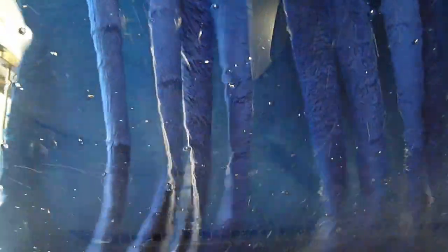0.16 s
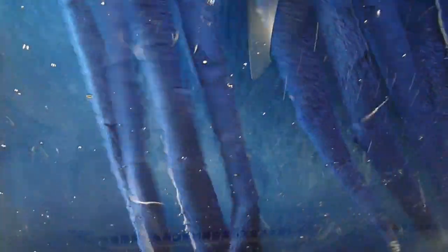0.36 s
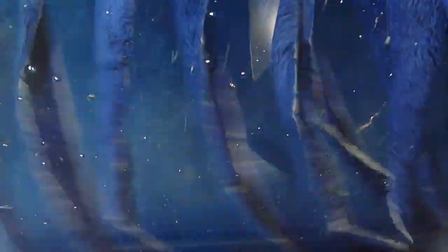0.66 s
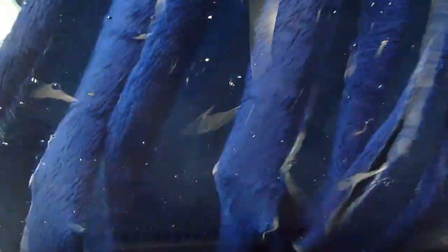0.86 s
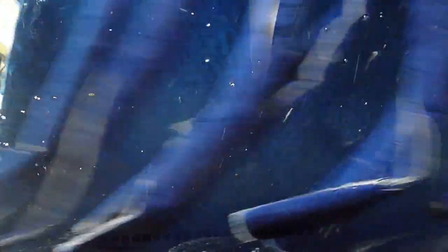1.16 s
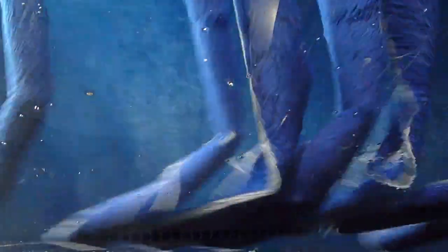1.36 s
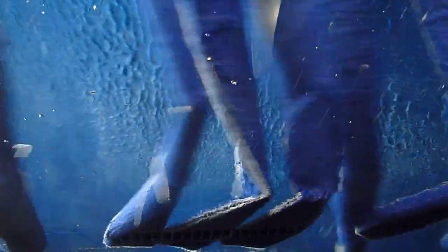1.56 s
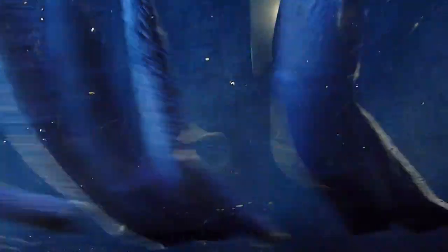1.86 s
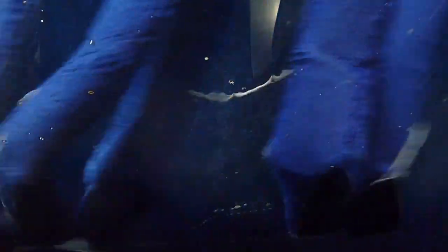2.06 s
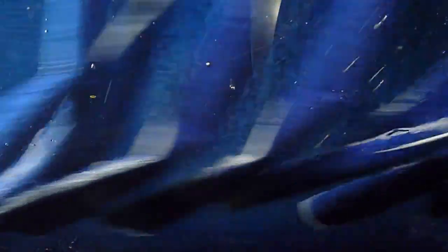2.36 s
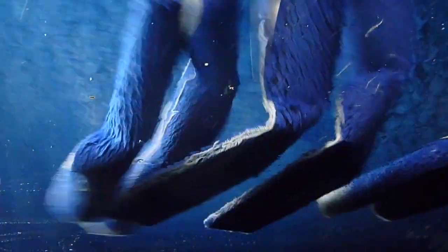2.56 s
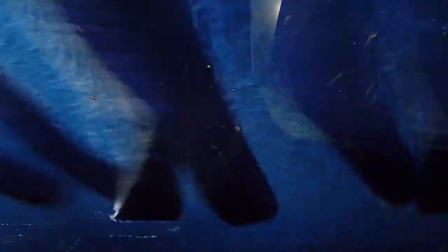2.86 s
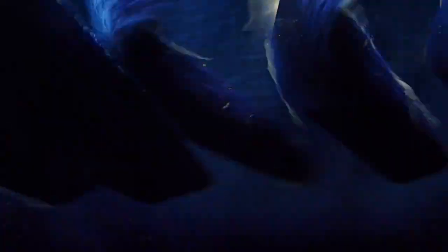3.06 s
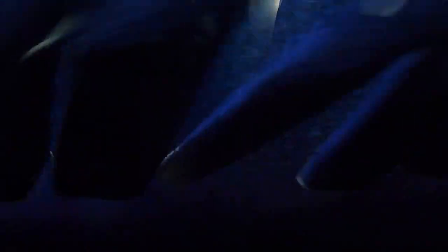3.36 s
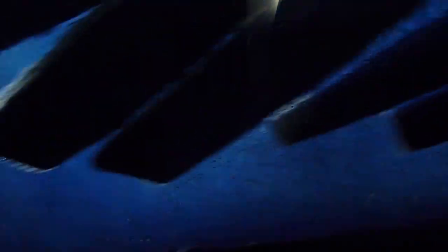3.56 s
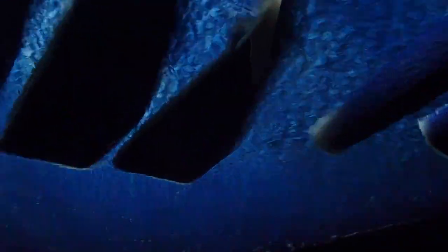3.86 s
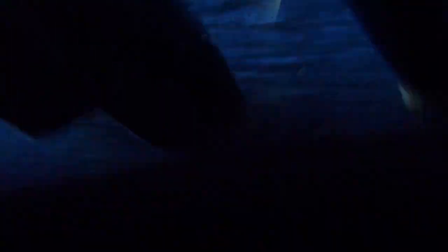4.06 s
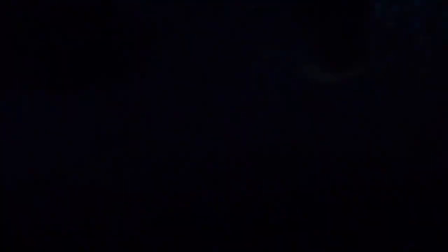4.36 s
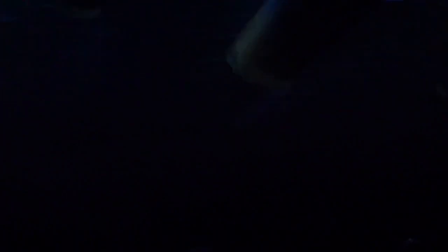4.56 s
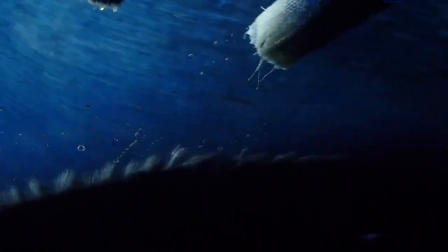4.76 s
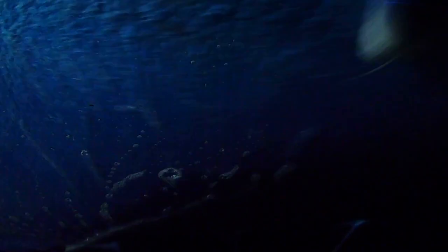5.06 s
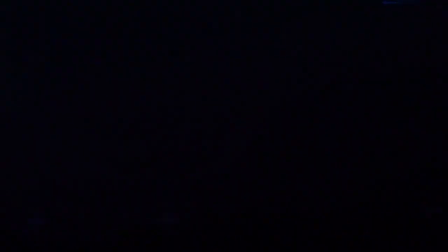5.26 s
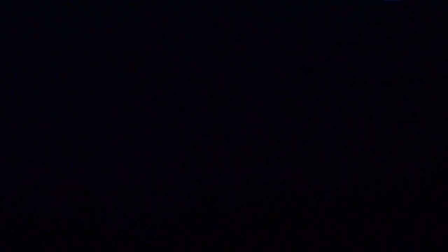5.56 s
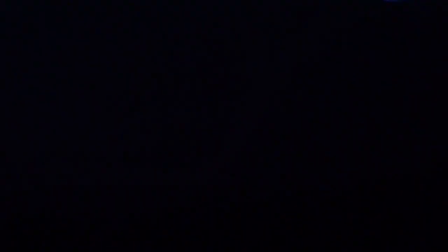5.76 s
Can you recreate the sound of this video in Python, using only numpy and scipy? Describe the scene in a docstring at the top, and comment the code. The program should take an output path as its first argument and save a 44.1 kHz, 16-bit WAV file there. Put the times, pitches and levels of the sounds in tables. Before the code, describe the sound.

Heavy wet cloth flaps, drags and smacks across car glass and panels, with deep cabin booms and spraying water fading to thinner mist.

```python
"""Hanging strips of wet cloth in an automatic car wash, heard from inside a closed car: they slap and wipe
across the glass with gritty impact noise, and pound the roof, whose blows ring the cabin's air modes.
Cloth dragging by stick and slip rocks the body, drones on the bonnet and growls on the panels.
Jets are dense random impacts, drumming on panels and spraying the windscreen; the mist thins as the car
rolls on. A faint machine whine of wavering sines and the filtered hiss of the wash hall lie behind."""
import sys
import numpy as np
from scipy import signal
from scipy.fft import rfft, irfft, next_fast_len
from scipy.io import wavfile
from scipy.ndimage import uniform_filter1d, minimum_filter1d

SR = 44100
rng = np.random.default_rng(int(sys.argv[2]) if len(sys.argv) > 2 else 0)


def persist_wave(psi):
    """Save psi, clipped to +-1, as 16-bit WAV."""
    counts = np.round(np.clip(psi, -1, 1) * 32767).astype(np.int16)
    wavfile.write(sys.argv[1], SR, np.atleast_2d(counts).T)


N = 261513
TIME = np.arange(N) / SR  # [s]
USUAL_SMACK_DB = -30  # smack level of an ordinary slap, before the overall smack level

# cloth strips hitting the windscreen: (time [s], smack level [dB], wetness = splash over smack [dB],
# landing time [s], ring of the struck spot [Hz])
SLAPS = [(0.097, -32.5, -15.5, .008, 1950), (0.216, -39, -2, 0.0074, 2080), (0.25, -38, -6.5, .012, 1900),
         (0.425, -36.5, -16.5, .015, 1150), (0.72, -36.5, -18.5, .012, 1190),
         (0.86, -40.5, -19, .012, 1100), (1.03, -41.5, -12, .006, 1255), (1.139, -37, -11.5, 0.0049, 1464),
         (1.194, -31.5, -14, 0.0079, 1885), (1.318, -37, -9, 0.0046, 1920),
         (1.463, -33.5, -17, 0.0029, 1380), (1.502, -35.5, -2.5, .007, 2790),
         (1.566, -33.5, -5.5, 0.0023, 1896), (1.832, -32, -11.5, 0.0097, 1100),
         (1.968, -29, -14.5, .005, 974), (2.002, -44, 3, 0.0075, 1985), (2.092, -27.5, -10, 0.008, 1715),
         (2.177, -41.5, -1, .002, 2880), (2.283, -28, -9, 0.0032, 1944), (2.305, -33, -14.5, 0.0036, 1600),
         (2.322, -38.5, 1, 0.0027, 3320), (2.382, -43, 0.5, .0026, 3800), (2.425, -36, -8, 0.014, 1204),
         (2.458, -37.5, -2, 0.0049, 1910), (2.489, -47.5, 1.5, 0.0041, 4170),
         (2.742, -31.5, -3, 0.0043, 2885), (2.769, -31, -15.5, .003, 1760),
         (2.891, -29.5, -5.5, 0.0095, 1610), (2.913, -32.5, -10, .008, 1175),
         (2.939, -30.5, -7, 0.0048, 1606), (3.059, -31, -6.5, .0025, 2030),
         (3.078, -33.5, -3.5, 0.0017, 2115), (3.084, -28, -9.5, 0.0035, 2100),
         (3.108, -45, -9.5, 0.0053, 1880), (3.201, -32.5, -7, .005, 1624), (3.214, -25, -8.5, 0.005, 1675),
         (3.353, -24, -18.5, 0.0033, 1620), (3.373, -36, -7.5, 0.011, 1475),
         (3.416, -26.5, -7.5, 0.0062, 1950), (3.555, -35, -4.5, .016, 1764),
         (3.588, -33.5, -12, 0.0069, 1640), (3.69, -29, -6.5, 0.0048, 2530),
         (3.719, -32.5, -8, .0094, 1348), (3.756, -40.5, -12, .0074, 1006),
         (3.864, -30, -5.5, 0.0051, 2610), (3.887, -25, -3, 0.0065, 2090), (4.033, -36, -2.5, .014, 1916),
         (4.187, -30, -25.5, .002, 1097), (4.207, -39, 0.5, .002, 2710), (4.226, -28, 1.5, .002, 5030),
         (4.246, -34.5, -2, .002, 2770), (4.255, -39, -5, 0.0017, 2310), (4.264, -39, -4.5, .002, 2715),
         (4.279, -29, 5.5, 0.0021, 2670), (4.368, -50.5, 4.5, .005, 2980), (4.384, -35, 0.5, 0.0028, 1910),
         (4.45, -29, -5, 0.002, 2170), (4.47, -40, -2.5, 0.0027, 1880), (4.539, -38.5, -2, 0.0028, 1880),
         (4.623, -35.5, -1, 0.0028, 2140), (4.69, -39, 2.5, 0.0046, 2290), (4.744, -44.5, 2, 0.0055, 2030),
         (4.881, -35, -4, 0.0024, 1680), (4.922, -41, 0, 0.0072, 4130), (5.074, -42, -1, 0.0027, 2296),
         (5.13, -40, -17.5, .012, 1106), (5.2, -38.5, -6.5, 0.0048, 1097), (5.224, -35, -12.5, .018, 1320),
         (5.351, -45, 0.5, 0.0026, 4120), (5.36, -39, -14, 0.0035, 2090), (5.509, -44.5, 1, 0.005, 2530),
         (5.592, -43.5, -2, 0.0077, 1690), (5.628, -40.5, -22, .005, 998), (5.746, -37, -4, 0.0037, 1815),
         (5.778, -41, -4.5, .005, 2310), (5.889, -38.5, -10.5, .005, 1500)]
# heavy strips landing on the roof: (time [s], relative strength [dB])
ROOF_BLOWS = [(0.05, 1.5), (0.463, -1), (0.555, -3.5), (0.724, -8), (0.83, -7), (1, -6), (1.112, -5),
              (1.325, -13), (1.455, -14), (1.782, -13), (1.992, -6.5), (2.294, 2), (2.441, -8.5),
              (3.152, -8), (3.541, -11), (3.717, -8.5), (3.878, -6), (4.191, -3), (4.378, -11.5),
              (4.463, -3.5), (4.849, -6.5), (4.98, -11.5), (5.14, -5), (5.279, -1.5), (5.414, -3),
              (5.836, -8)]
# spectrum of panels under drumming water or thudding cloth: (frequency [Hz], density [dB per Hz])
DRUM_SPECTRUM = [(150, -31), (260, -8.5), (340, 0), (420, -2.5), (530, -5.5), (610, -9), (760, -10),
                 (900, -19.5), (1300, -26.5), (2500, -48.5)]
# spectrum of water splashing on the glass: (frequency [Hz], density [dB per Hz])
SPLASH_SPECTRUM = [(1500, -31.5), (2400, 5), (2800, 4.5), (3400, 1), (4400, -2), (5300, -7), (6500, -14.5),
                   (8000, -30.5), (10000, -21.5)]


def from_db(db):
    """Amplitude is ten to the level over 20."""
    return 10 ** (np.asarray(db) / 20)


def rms_one(x):
    """Dividing by the root mean square gives unit power."""
    return x / np.sqrt(np.mean(x ** 2) + 1e-20)


def in_time(rows):
    """Linear interpolation of (time, level) rows gives a level at every sample."""
    return np.interp(TIME, *np.transpose(rows))


def drift(rate_hz):
    """Slow chance with spread 1: white noise through two equal one-pole low-passes."""
    step = 40  # samples between the points of the slow noise
    pole = np.exp(-2 * np.pi * rate_hz * step / SR)
    noise = rng.standard_normal(N // step + 2002)
    slow = signal.lfilter([1], [1, -2 * pole, pole * pole], noise)[2000:]  # without the filter's start
    return np.interp(np.arange(N) / step, np.arange(len(slow)), rms_one(slow))


def white_noise():
    """Independent normal samples carry equal power at all frequencies."""
    return rng.standard_normal(N)


def drops(per_s, spread_db):
    """Shot noise: impacts at random moments, many small and a few large."""
    sizes = from_db(spread_db * np.minimum(rng.exponential(1, N), 4))
    signs = rng.choice([-1, 1], N)
    return (rng.random(N) < per_s / SR) * sizes * signs


def coloured(x, spectrum):
    """Linear filtering multiplies the spectrum of x by a gain curve; rms 1."""
    size = next_fast_len(N)
    hz, level_db = np.transpose(spectrum)
    bins_hz = np.maximum(np.fft.rfftfreq(size, 1 / SR), 1)
    gain = from_db(np.interp(np.log(bins_hz), np.log(hz), level_db, left=-90, right=-90))
    return rms_one(irfft(rfft(x, size) * gain, size)[:N])


def band(x, hz, width_hz):
    """A damped resonator is a pole pair, with gain near 1 on top."""
    r = np.exp(-np.pi * width_hz / SR)
    zeros = np.array([1, 0, -1]) * (1 - r * r) / 2
    poles = [1, -2 * r * np.cos(2 * np.pi * hz / SR), r * r]
    return signal.lfilter(zeros, poles, x + 1e-18)


def resonate(x, modes):
    """Modal response: a plate passes x on and rings at its resonances; the overall level is kept."""
    ringing = sum(from_db(db) * band(x, hz, width_hz) for hz, width_hz, db in modes)
    return rms_one(x + ringing) * np.std(x)


def steadied(x, span_s, share):
    """Gain inverse to short-time power takes out a share of a noise's swells, so it follows its force."""
    power = uniform_filter1d(x * x, max(int(span_s * SR), 1))
    power = uniform_filter1d(power, max(int(span_s * SR / 2), 1))
    return rms_one(x / (power + 1e-9) ** (np.clip(share, 0, 1) / 2))


def hall_hiss(level_db):
    """Broadband noise of the wash hall outside, shaped by a fixed spectrum."""
    # (frequency [Hz], density [dB per Hz])
    hiss_spectrum = [(1500, -9.5), (3000, -5), (4500, 0.5), (6000, -0.5), (7500, -3), (9000, -17.5)]
    return from_db(level_db) * coloured(white_noise(), hiss_spectrum)


def whine(waver_hz):
    """Frequency modulation: machine tones whose phase accumulates a slightly drifting frequency."""
    # (frequency [Hz], rms level [dB])
    tones = [(6222, -87), (6666, -80), (7530, -88)]
    out = np.zeros(N)
    for hz, db in tones:
        phase = 2 * np.pi * np.cumsum(hz + waver_hz * drift(2.6)) / SR
        out += from_db(db) * np.sqrt(2) * np.sin(phase)
    return out


def drumming_level():
    """Source strength of the water drumming on the panels."""
    # (time [s], level [dB])
    drumming = [(0, -26.5), (0.35, -26), (1.45, -30.5), (1.92, -26.5), (2.15, -28), (2.85, -27.5),
                (3.35, -30.5), (4.7, -29.5), (5.25, -27.5), (5.65, -25), (5.93, -27)]
    return in_time(drumming)


def spray_level():
    """Source strength of the windscreen spray, which thins as the car rolls out of the jets."""
    # (time [s], level [dB])
    spraying = [(0, -40), (0.45, -39.5), (1.02, -39), (1.11, -45), (1.17, -43), (1.4, -41.5), (1.5, -41),
                (1.7, -38), (1.86, -37.5), (2.2, -36.5), (2.42, -37.5), (2.62, -40), (2.8, -40),
                (3.25, -44), (4.12, -45), (4.4, -44.5), (5.1, -42.5), (5.93, -43)]
    return in_time(spraying)


def mist_level():
    """Source strength of the fine mist, which clears first."""
    # (time [s], level [dB])
    misting = [(0, -44), (0.75, -44.5), (1.35, -48), (1.9, -45), (2.7, -49), (3.25, -55.5), (4.4, -55.5),
               (5.7, -55), (5.93, -54)]
    return in_time(misting)


def jet_shadow():
    """Shielding: strips swinging across the jets hold water back from the glass, by this many dB."""
    # (middle [s], half-length to 1/e of the depth [s], depth [dB])
    shadows = [(0.203, 0.012, 2.5), (1.24, .03, 1), (1.637, .035, 2.5), (1.936, 0.028, 3.5),
               (2.051, .025, 5), (2.21, .035, 5.5), (2.36, .02, 4), (2.51, .03, 8), (2.686, .02, 1),
               (3.043, .025, 2.5), (3.306, 0.033, 4.5), (3.635, 0.016, 0.5), (4.338, .025, 2.5),
               (4.59, .025, 1), (5.424, .04, 1)]
    return sum(depth_db * np.exp(-((TIME - s) / length) ** 2) for s, length, depth_db in shadows)


def jets(drum_db, spray_db, mist_db):
    """Shot noise of drops on panels and glass, in shared spurts as the strips cut through the jets."""
    # spectra of the spray and of the fine mist: (frequency [Hz], density [dB per Hz])
    spray_spectrum = [(500, -17.5), (850, 3.5), (1000, -0.5), (1500, 0), (2000, -4), (2400, -11),
                      (3200, -22), (6000, -55.5)]
    mist_spectrum = [(1500, -26), (2400, 1), (2900, 0.5), (3400, 0.5), (4200, -7.5), (5000, -10.5),
                     (6300, -13.5), (7500, -23.5), (9000, -21.5)]
    spurts = drift(13)
    drum = steadied(coloured(drops(per_s=2000, spread_db=2), DRUM_SPECTRUM), span_s=0.081, share=1.0)
    spray = coloured(drops(per_s=5000, spread_db=2.5), spray_spectrum)
    mist = coloured(drops(per_s=10000, spread_db=1.5), mist_spectrum)
    on_panels = from_db(drum_db - 0.98 + 1.7 * spurts) * drum
    on_glass = from_db(spray_db + 2.3 * spurts) * spray
    on_glass += from_db(mist_db + 1.2 * spurts + 0.97 * drift(30)) * mist
    return on_panels, on_glass


def roof_roar(jet_db):
    """Forced vibration: the jets that spray the glass also keep the roof sheet's modes ringing."""
    # (frequency [Hz], width [Hz], level [dB])
    roof_modes = [(550, 32, 0.5), (657, 32, -3), (1020, 66, -3.5)]
    water = coloured(drops(per_s=3400, spread_db=-1.5), DRUM_SPECTRUM)
    ringing = sum(from_db(db) * band(water, hz, width_hz) for hz, width_hz, db in roof_modes)
    return from_db(jet_db + 10.5) * steadied(ringing, span_s=0.15, share=0.66)


def droplets(spray_db, per_s, level_db):
    """Sparse shot noise: drops flung off the cloth tick on the glass, louder with more spray."""
    return from_db(spray_db + level_db) * coloured(drops(per_s, spread_db=4.5), SPLASH_SPECTRUM)


def bonnet_drag(mist_db, shadow_db, wipe_db, catching_db):
    """Stick-slip friction: the bonnet drones, and water squeezed along the glass hisses unevenly."""
    # wet cloth dragging over the bonnet and up the glass: (time [s], level [dB])
    drag = [(0, -40.5), (1.2, -33.5), (1.9, -28.5), (2.45, -34), (2.85, -31.5), (3.7, -47.5), (5.93, -49.5)]
    # resonances of the bonnet: (frequency [Hz], width [Hz], level [dB])
    bonnet_modes = [(217, 28, -6), (256, 150, -9), (534, 61, -5), (700, 48, 0.5)]
    # spectra of the slips and of the wiping: (frequency [Hz], density [dB per Hz])
    slip_spectrum = [(110, -29.5), (180, 4.5), (690, -8), (780, -22), (1000, -25), (2000, -49.5)]
    wipe_spectrum = [(1100, -20), (1700, -4), (2200, -3), (3100, 0), (3500, -16.5), (5000, -35.5)]
    # the hiss needs water: it takes a share of the mist's swing about this level [dB]
    mist_share, usual_mist_db = 0.41, -54.5
    slips = coloured(drops(per_s=1200, spread_db=3.0), slip_spectrum)
    ringing = sum(from_db(db) * band(slips, hz, width_hz) for hz, width_hz, db in bonnet_modes)
    drone = steadied(ringing, span_s=0.12, share=1.0)
    hiss_db = wipe_db - shadow_db + mist_share * (mist_db - usual_mist_db) + catching_db * drift(28)
    wipe = from_db(hiss_db) * coloured(drops(per_s=12000, spread_db=5.0), wipe_spectrum)
    return from_db(in_time(drag)) * (drone + wipe)


def roof_load():
    """Static load: each heavy strip leans on the roof, then slides off."""
    rise_s, fall_s = 0.034, 0.024
    return sum(from_db(db) * np.interp(TIME - s, [0, rise_s, rise_s + fall_s], [0, 1, 0])
               for s, db in ROOF_BLOWS)


def body(load, drum_db):
    """Forced oscillation: dragging cloth rocks the car and keeps the cabin air booming."""
    # how hard the dragging cloth rocks the car: (time [s], level [dB])
    rocking = [(0, -27.5), (0.28, -24), (1.15, -24), (1.8, -28), (2.7, -29), (2.98, -19), (3.25, -27),
               (4.0, -27.5), (4.9, -25.5), (5.93, -27.5)]
    # spectra of the rocking and of the boom: (frequency [Hz], density [dB per Hz])
    sway_spectrum = [(14, -25), (22, -10.5), (31, -13), (40, 0), (54, -12), (68, -5), (82, -10),
                     (110, -30.5), (200, -64.5)]
    boom_spectrum = [(50, -35), (80, -12.5), (103, -2.5), (121, 3), (137, 1), (155, -0.5), (180, 0.5),
                     (205, -7.5), (250, -7.5), (300, -13.5), (500, -51)]
    load_sway_db, load_boom_db = 5.5, 6.5  # extra rocking and boom under a 0 dB roof blow
    boom_level_db, drum_share, usual_drum_db = -23.5, 0.46, -27  # boom takes a share of the drumming's swing
    sway_db = in_time(rocking) + load_sway_db * load
    boom_db = boom_level_db + drum_share * (drum_db - usual_drum_db) + load_boom_db * load
    sway = steadied(coloured(white_noise(), sway_spectrum), span_s=0.22, share=0.19)
    boom = steadied(coloured(drops(per_s=900, spread_db=0.0), boom_spectrum), span_s=0.077, share=0.83)
    return from_db(sway_db - 4.0) * sway + from_db(boom_db) * boom


def body_shake():
    """Momentum transfer: each slap also gives the body a dull push that outlasts the smack."""
    # (frequency [Hz], density [dB per Hz])
    shake_spectrum = [(70, -22), (120, -0.5), (190, 1.5), (260, -4), (400, -23), (700, -41.5)]
    level_db, rise_s, fall_s = -27, 0.018, 0.078  # push of an ordinary slap
    smack_share = 0.18  # share of the smack's strength in dB that gets into the body
    power = np.zeros(N)
    for s, smack_db, *_ in SLAPS:
        push = np.interp(TIME - s, [0, rise_s, rise_s + fall_s], [0, 1, 0])
        power += (from_db(smack_share * (smack_db - USUAL_SMACK_DB)) * push) ** 2
    noise = steadied(coloured(white_noise(), shake_spectrum), span_s=0.044, share=0.56)
    return from_db(level_db) * np.sqrt(power) * noise


def roof_bumps(level_db):
    """Impulse response of the cabin: soft heavy blows set its air modes ringing and decaying."""
    # air modes of the cabin: (frequency [Hz], level [dB], t60 [s])
    cabin_modes = [(121.5, 1, 0.17), (149.6, 5, 0.097), (167.3, -16, 0.11)]
    out, age = np.zeros(N), TIME[:SR // 2]
    onset = 1 - np.exp(-age / 0.01)
    for s, strength_db in ROOF_BLOWS:
        ring = np.zeros(len(age))
        for hz, db, t60 in cabin_modes:
            mode_db = db + 2 * rng.standard_normal() - 60 * age / t60
            ring += from_db(mode_db) * np.sin(2 * np.pi * hz * age)
        at = int(s * SR)
        out[at:at + len(age)] += (from_db(strength_db + level_db) * ring * onset)[:N - at]
    return out


def panel_surges(level_db, width_share):
    """Stick-slip judder: a strip catches on a panel, which growls broadly around that spot's pitch."""
    # (middle [s], half-length to exp(-2) of the height [s], relative level [dB], pitch [Hz])
    surges = [(0.105, 0.021, -29, 520), (0.257, 0.035, -26, 494), (0.43, 0.089, -26.5, 400),
              (0.698, 0.022, -27, 397), (0.844, 0.027, -22.5, 460), (0.925, 0.027, -24.5, 520),
              (1.534, 0.017, -23, 483), (1.792, 0.025, -21, 385), (1.862, .025, -30, 400),
              (1.929, 0.027, -17, 330), (1.978, 0.018, -21, 554), (2.015, .022, -21, 520),
              (2.433, 0.023, -22, 494), (2.954, 0.058, -37, 380), (4.477, 0.038, -21.5, 372),
              (5.23, 0.092, -26, 467), (5.383, 0.037, -28, 476), (5.505, 0.042, -28.5, 517),
              (5.638, 0.033, -27, 370)]
    slips, out = drops(per_s=1100, spread_db=2.0), np.zeros(N)
    for s, length, db, hz in surges:
        width_hz = width_share * hz
        growl = steadied(band(band(slips, hz, width_hz), hz, width_hz), span_s=0.011, share=0.5)
        out += from_db(db + level_db) * np.exp(-2 * ((TIME - s) / length) ** 2) * growl
    return out


def hem_knocks(level_db):
    """Modal impact: a strip's stiff hem raps the glass and one hard contact rings the spot's modes."""
    # (time [s], relative peak [dB], pitch of the spot [Hz])
    knocks = [(2.1, -19, 1720), (2.106, -20, 1740), (2.18, -31, 2900), (2.288, -27, 1900),
              (2.762, -21, 1820), (3.083, -15.5, 2060), (3.089, -13.5, 2110), (3.2196, -18, 1500),
              (3.3553, -14, 1280), (3.429, -24, 1920), (3.596, -25, 1400), (3.697, -28, 2660),
              (3.767, -21.5, 980), (3.897, -21, 2220), (3.904, -14, 1315), (4.189, -17, 1285),
              (4.194, -21, 1050), (4.21, -24, 2500), (4.248, -26, 2690), (4.2575, -24, 2560),
              (4.267, -27, 2680), (4.282, -13.5, 2700), (4.29, -23, 2820), (4.2947, -27, 2500),
              (4.453, -18, 1950), (4.459, -21, 2160), (4.882, -24, 1900), (5.365, -32, 2120)]
    # modes of the rapped spot: (ratio to its pitch, level [dB], t60 [s])
    spot_modes = [(.62, -4.5, .022), (.8, -3, .028), (1, 0, .026), (1.27, -11, .018), (1.6, -7.5, .014),
                  (2.1, -10, .01)]
    out, age = np.zeros(N), TIME[:SR // 10]
    for s, peak_db, hz in knocks:
        ring = np.zeros(len(age))
        for k, (ratio, db, t60) in enumerate(spot_modes):
            mode_hz = hz * ratio * (1 + 0.022 * rng.standard_normal())
            ring += (-1) ** k * from_db(db - 60 * age / t60) * np.sin(2 * np.pi * mode_hz * age)
        at = int(s * SR)
        out[at:at + len(age)] += from_db(peak_db + level_db) * ring / np.abs(ring).max()
    return out


def light_slaps(spray_db):
    """Random light contacts that carry the spray along, as rows like those of the slaps."""
    count, over_spray_db, spread_db = 12, -18, 5
    wetness_db, landing_s, ring_hz = -11, 0.012, 2340
    when, size = rng.random((count, 2)).T
    at = (when * (N - SR // 20)).astype(int)
    smack_db = spray_db[at] + over_spray_db + spread_db * (2 * size - 1)
    return [(s, db, wetness_db, landing_s, ring_hz) for s, db in zip(TIME[at], smack_db)]


def cloth_slaps(spray_db, mist_db, smack_db, splash_db, ring_db, ring_share,
                crack_db, crack_s, tail_db, tail_t60, flutter_db):
    """Distributed impact: wet cloth lands fold by fold with thud, gritty smack, splash and cabin tail."""
    # spectra of the smack and of the whipping tip's crack: (frequency [Hz], density [dB per Hz])
    smack_spectrum = [(500, -25), (900, -2.5), (1200, 0.5), (1600, -1), (2100, -2), (2600, -9.5),
                      (3500, -24), (6000, -50.5)]
    crack_spectrum = [(1200, -11), (2400, 1.5), (3100, 2.5), (3800, -5), (4700, -3), (5800, -3.5),
                      (7000, -8), (9000, -18)]
    usual_landing_s = 0.0034
    # the thud grows with the smack (share of its dB) and with the landing time (dB per doubling)
    thud_db, thud_share, thud_db_per_doubling = -29, 0.37, 1.5
    ring_follows = 0.37  # the harder the slap, the more the struck spot rings: share of its dB
    folds_hz, splash_power = 170, 1.41  # folds land in quick succession; the splash dies before the force
    # a strip clings longer on streaming glass: this t60 at this mist level, doubling per so many dB of mist
    cling_t60_s, cling_mist_db, cling_doubles_db = 0.079, -60, 16
    # it rebounds sooner from a hard hit (t60 halves per so many dB) or a quick flick (doublings per doubling)
    rebound_halves_db, cling_follows = 33.5, 0.27

    thuds = steadied(coloured(white_noise(), DRUM_SPECTRUM), span_s=0.0033, share=1.0)
    smacks = steadied(coloured(drops(per_s=1100, spread_db=4.0), smack_spectrum), span_s=0.004, share=1.0)
    splashes = coloured(drops(per_s=2500, spread_db=3.5), SPLASH_SPECTRUM)
    splashes = steadied(splashes, span_s=0.0014, share=0.96)
    cracks = coloured(white_noise(), crack_spectrum)
    folds = from_db(flutter_db * np.tanh(drift(folds_hz)))
    on_panels, on_glass = np.zeros((2, N))
    for s, smack, wetness, landing, ring_hz in SLAPS + light_slaps(spray_db):
        span = slice(int(s * SR), min(int(s * SR) + SR // 3, N))
        age = TIME[:span.stop - span.start]
        landing = max(landing, .002)
        hardness, slowness = smack - USUAL_SMACK_DB, np.log2(landing / usual_landing_s)
        thud = thud_db + thud_share * hardness + thud_db_per_doubling * slowness
        doublings = (mist_db[span.start] - cling_mist_db) / cling_doubles_db
        doublings += cling_follows * slowness - hardness / rebound_halves_db
        t60 = cling_t60_s * 2 ** doublings
        since = np.maximum(age - landing, 0)
        dying = np.hypot(from_db(-60 * since / t60), from_db(tail_db - 60 * since / tail_t60))
        force = np.minimum(age / landing, 1) ** 2 * dying * folds[span]
        # the tip whips onto the glass: the quicker the landing, the harder the crack
        tip_age = age - 0.8 * landing
        tip_decay = (tip_age > 0) * np.exp(-np.abs(tip_age) / crack_s)
        whip = from_db(crack_db) * np.sqrt(0.0027 / landing) * tip_decay
        wet = from_db(smack + smack_db) * np.hypot(force, whip) * smacks[span]
        splash = force ** splash_power * splashes[span] + whip * cracks[span]
        wet += from_db(smack + wetness + splash_db) * splash
        struck_spot = [(ring_hz, ring_share * ring_hz, ring_db + ring_follows * hardness)]
        on_glass[span] += resonate(wet, struck_spot)
        on_panels[span] += from_db(thud) * force * thuds[span]
    return on_panels, on_glass


def scene():
    """Superposition: cloth and water work on roof, panels and glass, all heard from the cabin."""
    # resonances of the side panels and doors, and of the windscreen: (frequency [Hz], width [Hz], level [dB])
    panel_modes = [(321.4, 54, -1.5), (380, 17, 0.5), (461, 31, -4.5), (555, 48, -6), (808, 20, -2.5)]
    glass_modes = [(987, 62, 8.5), (1182, 120, 4.5), (1343, 69, -2), (1780, 460, -2.5), (2074, 56, -8.5),
                   (2510, 390, -4.5), (3010, 74, -5), (4080, 700, -5.5)]
    drum_db, spray_db, mist_db = drumming_level(), spray_level(), mist_level()
    shadow_db = jet_shadow()
    hall = hall_hiss(level_db=-65.5) + whine(waver_hz=4.0)
    water_on_panels, water_on_glass = jets(drum_db, spray_db - shadow_db, mist_db - shadow_db)
    cloth_on_panels, cloth_on_glass = cloth_slaps(
        spray_db, mist_db, smack_db=-3.0, splash_db=0.0, ring_db=2.5, ring_share=0.11,
        crack_db=-4.0, crack_s=0.0035, tail_db=-30.0, tail_t60=0.26, flutter_db=2.5)
    rumble = body(roof_load(), drum_db) + body_shake() + roof_bumps(level_db=-7.5)
    panels = resonate(water_on_panels + cloth_on_panels, panel_modes)
    panels += roof_roar(mist_db) + panel_surges(level_db=-1.5, width_share=0.37)
    ticks = droplets(spray_db - shadow_db, per_s=320, level_db=-19.0)
    glass = resonate(water_on_glass + cloth_on_glass + ticks, glass_modes) + hem_knocks(level_db=-3.5)
    drag = bonnet_drag(mist_db, shadow_db, wipe_db=-22.5, catching_db=3.5)
    return (rumble + panels + glass + drag + hall)[None]


def limiter(x, ceiling_db, release_db_per_s):
    """Peak limiting by gain control: looks a moment ahead, ducks under each peak and recovers."""
    over_db = np.maximum(20 * np.log10(np.abs(x) + 1e-9) - ceiling_db, 0)
    recovery_db = release_db_per_s * TIME
    held_db = np.maximum.accumulate(over_db + recovery_db, axis=-1) - recovery_db
    return x * uniform_filter1d(minimum_filter1d(from_db(-held_db), size=129), size=129)


def record(dry):
    """Band limitation: peaks are limited, then a steep low-pass cuts the top."""
    limited = limiter(dry, ceiling_db=-10.3, release_db_per_s=150)
    low_pass = signal.butter(22, 8100, fs=SR, output="sos")  # cutoff in Hz
    return signal.sosfilt(low_pass, limited)


dry = scene()
out = record(dry)
persist_wave(out)
```